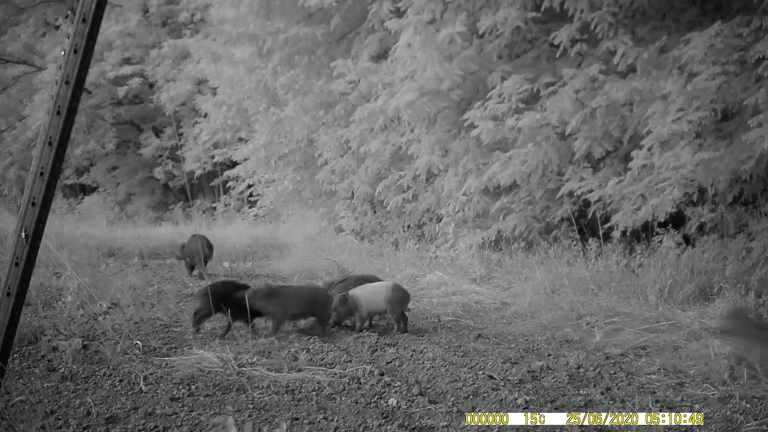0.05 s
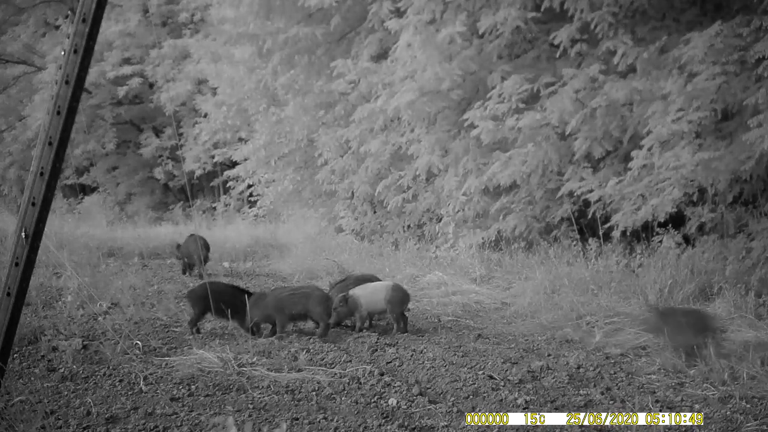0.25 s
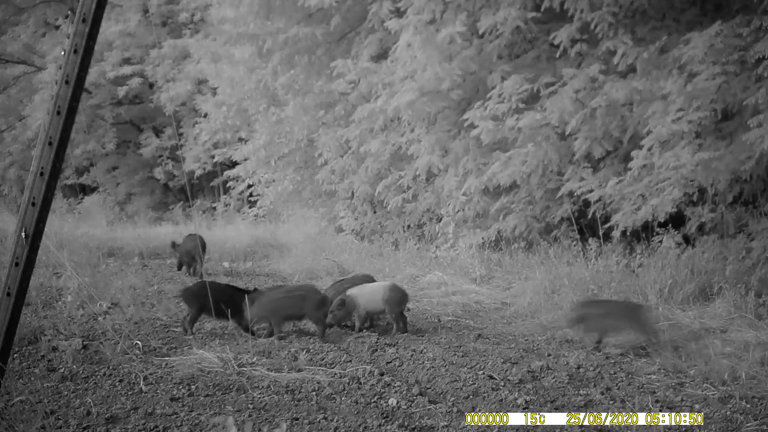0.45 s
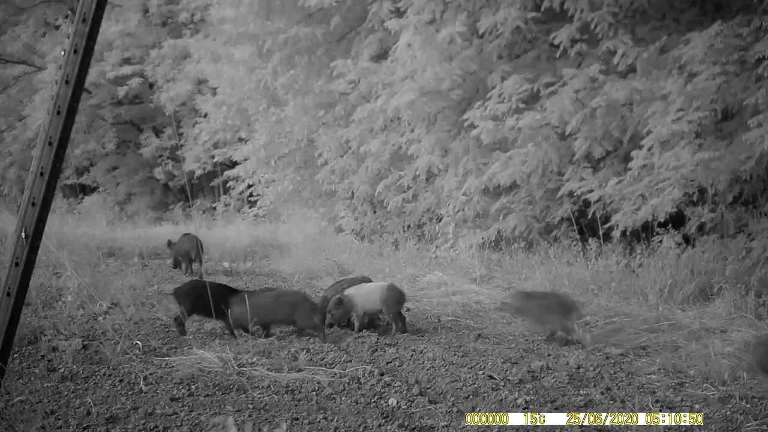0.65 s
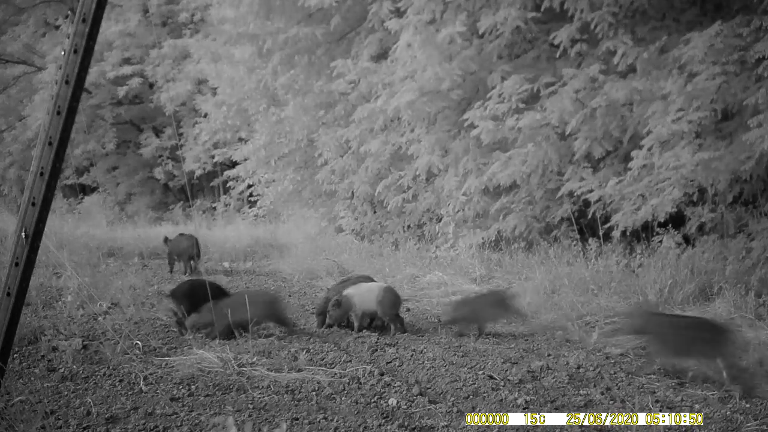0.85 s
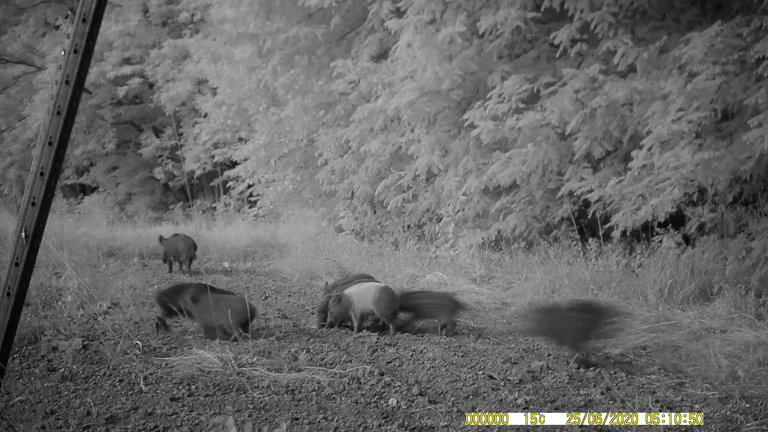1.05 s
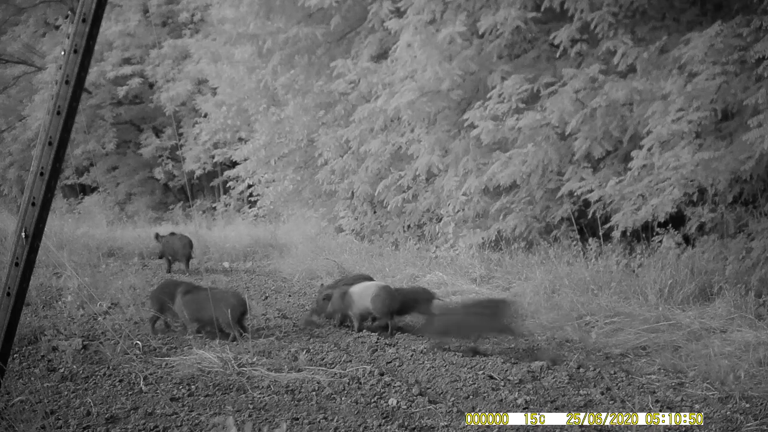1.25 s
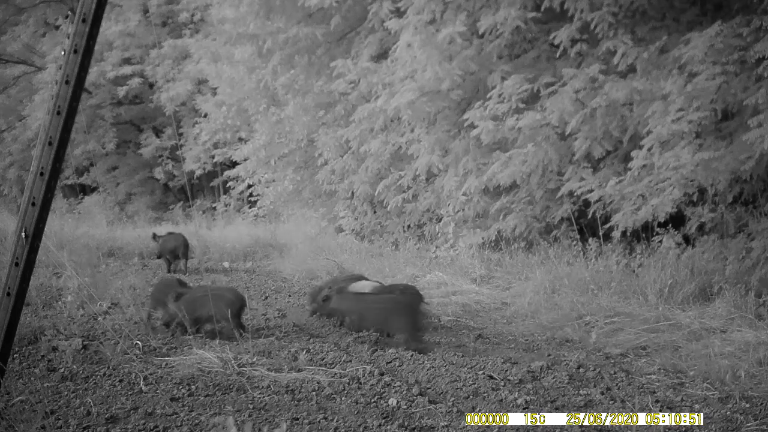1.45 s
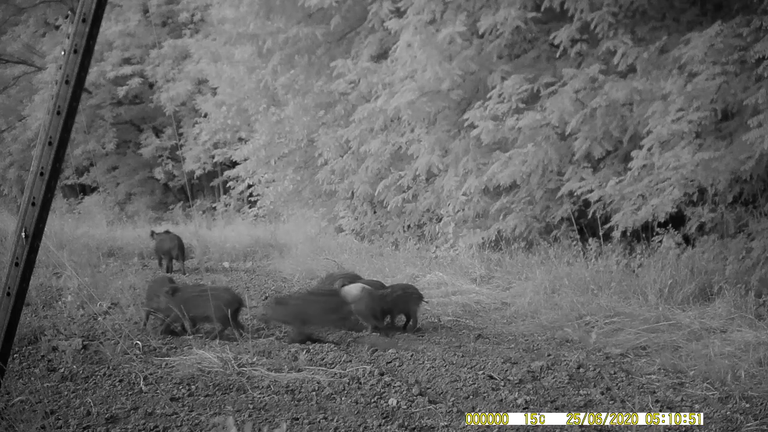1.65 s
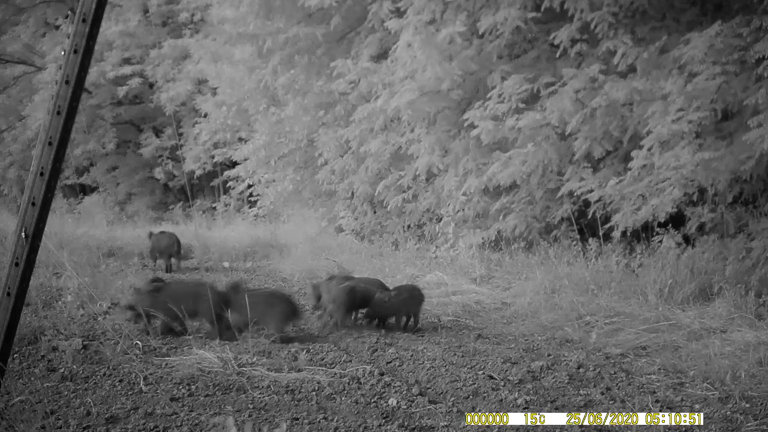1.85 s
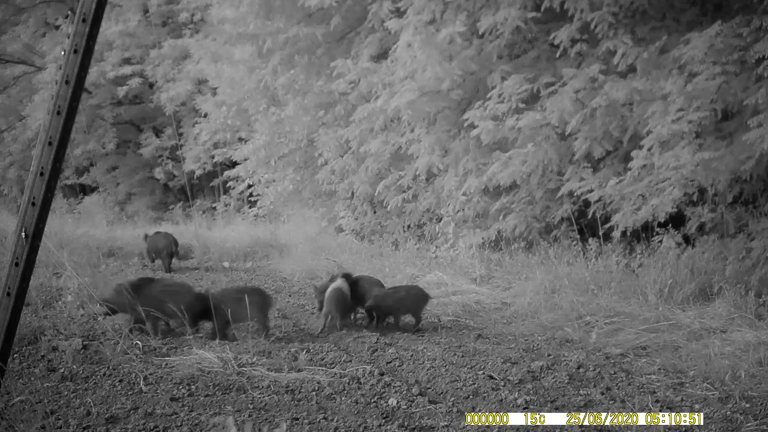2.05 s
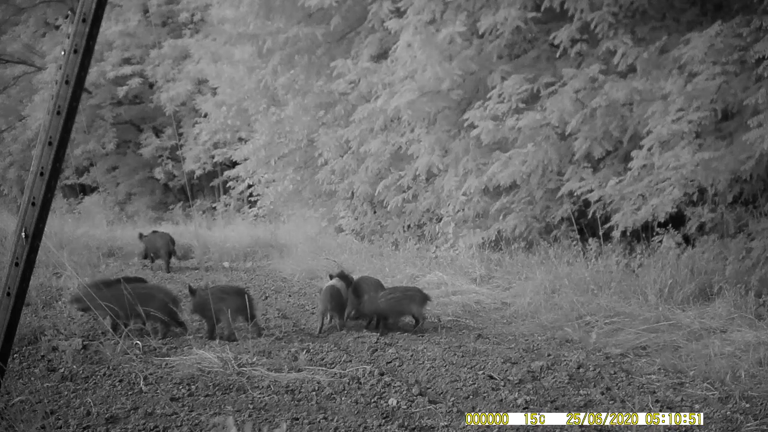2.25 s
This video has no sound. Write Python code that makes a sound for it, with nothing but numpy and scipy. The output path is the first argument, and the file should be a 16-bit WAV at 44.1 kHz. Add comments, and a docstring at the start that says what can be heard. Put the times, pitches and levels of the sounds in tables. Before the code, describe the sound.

Wild boars rustle through dry grass throughout, scuffing soil and snapping stalks, busiest from 0.5 to 1 second and easing after 2. One sharp, close click comes at 0.2 seconds. A small bird gives high, buzzy trills at about 0.5, 1.1 and 1.8 seconds, while another whistles faintly far off. Two tiny squeaks pass near 1.5 and 1.8 seconds. Underneath are steady hiss and low rumble with soft, dull swells.

```python
"""Dry grass rustles and snaps as wild boars trot and root through it, scuffing the loose soil. A small bird
repeats a buzzy trill of quick chips, another whistles far off, and two tiny squeaks pass. One sharp click
sounds at a trail camera, whose housing rings near 5 kHz in the click and the snapping stalks. Under it all lie
a low rumble with soft, dull swells and a steady hiss."""
import sys
import numpy as np
from scipy import signal
from scipy.fft import rfft, irfft, next_fast_len
from scipy.io import wavfile
from scipy.ndimage import map_coordinates

SR = 44100
rng = np.random.default_rng(int(sys.argv[2]) if len(sys.argv) > 2 else 0)


def wav_out(sig):
    """Save sig, one row per channel (or a flat mono array), as 16-bit PCM at SR to the path in sys.argv[1]."""
    wavfile.write(sys.argv[1], SR, np.round(np.clip(np.atleast_2d(sig).T, -1, 1) * 32767).astype(np.int16))


N = 101429


def boars(flutter_db=1.38, scuff_rise_s=0.0011):
    """Boars brush through the grass, scuff the soil and snap stalks."""
    # the herd's rustling (time [s], level [dB])
    rustle = [(0, -53), (.06, -49), (.12, -55), (.29, -55.5), (.40, -51.5), (.46, -52.5), (.55, -51.5),
              (.61, -54.5), (.71, -47), (.81, -51.5), (.91, -50), (1.0, -51.5), (1.25, -52), (1.43, -55.5),
              (1.65, -49.5), (1.77, -52), (2.01, -53), (2.08, -59), (2.3, -61.5)]
    # hoof and snout scuffs (time [s], grass level [dB], length [s], soil level [dB])
    scuffs = [(.008, -50.5, 0.023, -68), (0.494, -48, 0.016, -64), (0.531, -49.5, 0.02, -79),
              (0.552, -47.5, 0.0078, -75), (0.734, -45, 0.012, -52.5), (0.861, -47, 0.0096, -70),
              (0.889, -47, 0.0072, -57), (0.919, -47.5, 0.013, -63), (.998, -56, 0.0075, -63),
              (1.366, -46.5, 0.011, -76), (1.448, -47.5, 0.0073, -75), (1.596, -47.5, 0.016, -63),
              (1.643, -47, 0.0098, -73), (1.807, -47, 0.015, -70), (1.869, -47, 0.0066, -76),
              (2.004, -50.5, 0.018, -70), (2.115, -52, 0.018, -80)]
    # snapping stalks and crumbs (time [s], peak level [dB])
    snap_times = [(.151, -38), (.221, -35), (.3015, -39), (.320, -34), (.564, -31), (.690, -36),
                  (.7345, -33), (.743, -34), (.748, -31), (.8837, -26), (.9093, -31), (1.366, -35),
                  (1.576, -39), (1.872, -35), (1.947, -35), (2.173, -36), (2.2255, -42)]
    # tone of dry grass (frequency [Hz], relative level [dB])
    grass_tone = [(300, -58), (900, -11), (1400, -15), (1900, -16), (2900, -11), (3700, -7), (4450, -2),
                  (4900, -0.5), (5450, 1), (6100, -2), (7000, -5.5), (8200, -9), (9400, -11), (11000, -12),
                  (12500, -18), (15500, -28.5)]
    # tone of crunching soil (frequency [Hz], relative level [dB])
    soil_tone = [(200, -20), (700, -46), (1400, 8), (2000, 5), (3000, -10), (5000, 4), (9000, -36)]
    t = np.arange(N) / SR
    grass_power = amp(np.interp(t, *np.transpose(rustle)) + flutter_db * wobble(55.07)) ** 2
    soil_power = np.zeros(N)
    for start, grass_db, length, soil_db in scuffs:
        stroke = np.clip((t - start) / scuff_rise_s, 0, 1) * np.exp(-((t - start) / length) ** 2)
        grass_power += amp(grass_db) ** 2 * stroke
        soil_power += amp(soil_db) ** 2 * stroke
    snaps = ticks(snap_times, low_cut_hz=1900)
    grass = np.sqrt(grass_power) * crackle(grass_tone)
    soil = np.sqrt(soil_power) * crackle(soil_tone)
    return grass + soil + snaps + amp(-3.5) * woods(snaps, size=0.084)


def crackle(tone, breaks_per_s=2500, spread_db=2.7):
    """Many tiny breaks of uneven size, mixed equally with a soft brushing noise."""
    sizes = amp(spread_db * np.minimum(rng.exponential(size=N), 4))
    breaks = rng.random(N) < breaks_per_s / SR
    grains = unit(breaks * sizes * rng.choice([-1, 1], N))
    return coloured(grains + rng.standard_normal(N), tone)


def click(start_s=.2398, gap_s=.00101, first_db=-11, loss_db=2.5):
    """A close, dry click: the contact chatters back and forth, weaker each time."""
    chatter = np.zeros(N)
    for k in range(3):
        chatter += (-1) ** k * ticks([(start_s + k * gap_s, first_db - k * loss_db)], low_cut_hz=855)
    return chatter + amp(-13.5) * woods(chatter, size=0.14)


def ticks(hits, low_cut_hz, crack_db=-12, crack_fade_s=0.0038):
    """Sharp contacts: a crack and a brief ring of the housing, too small to carry any bass."""
    # ringing of the camera housing (pitch [Hz], relative level [dB], time to fade by 60 dB [s])
    housing = [(1310, -7, 0.014), (1650, -9, 0.0056), (2160, -0.5, 0.0052), (3150, -9, 0.024),
               (4330, 3, 0.0093), (5054, 11.5, 0.0048), (6340, -61, 0.0027), (8700, -10, 0.0037),
               (10800, -35, 0.0022)]
    # tone of the crack (frequency [Hz], relative level [dB])
    crack_tone = [(200, -40), (700, -20), (1300, 12), (6000, 5), (9500, -32), (15000, 5)]
    out, t = np.zeros(N), np.arange(SR // 25) / SR
    ring = sum(amp(db - 60 * t / fade) * np.sin(2 * np.pi * hz * t) for hz, db, fade in housing)
    noise = coloured(rng.standard_normal(N), crack_tone)
    bass_cut = signal.butter(2, low_cut_hz, "high", fs=SR, output="sos")
    for start, db in hits:
        crack = amp(crack_db - 60 * t / crack_fade_s) * np.roll(noise, -int(start * SR))[:len(t)]
        tick = signal.sosfilt(bass_cut, signal.sosfilt(bass_cut, ring + crack))
        add(out, start, amp(db) * tick / np.abs(tick).max())
    return out


def trilling_bird(chips=14, chip_hz=4430, fall_per_s=36, swell_db=4):
    """Each trill is a run of falling chips that slow down, lengthen and grow louder."""
    # the small bird's trills (time [s], level near the end [dB])
    trills = [(.5411, -43.5), (1.0827, -44), (1.8499, -44.5), (2.269, -53)]
    gap_s, gap_growth_s = .01262, .000193
    width_s, width_growth_s, tail_s = 0.0014, .00007, .0046
    out, t = np.zeros(N), np.arange(-SR // 100, SR // 100) / SR  # t is 0 at a chip's middle
    for start, db in trills:
        for k in range(chips):
            pitch_nudge, level_nudge, time_nudge = rng.normal(0, [.012, 1.5, .0004])  # ratio, dB, s
            hz = chip_hz * (1 + pitch_nudge) * np.exp(-fall_per_s * t)
            width = width_s + width_growth_s * k
            shape = np.exp(1 - np.sqrt(1 + (t / width) ** 2) - (t / tail_s) ** 4)
            level = amp(db + level_nudge - swell_db * (1 - k / chips) ** 2)
            middle = start + time_nudge + gap_s * k + gap_growth_s * k * k / 2
            add(out, middle + t[0], level * shape * np.sin(2 * np.pi * np.cumsum(hz) / SR))
    return out + amp(-19) * woods(out)


def squeaks():
    """Two short falling squeaks."""
    # squeaks (time [s], length [s], start pitch [Hz], middle pitch [Hz], end pitch [Hz], level [dB])
    notes = [(1.466, .018, 2380, 2280, 2000, -52), (1.833, .0045, 2600, 2100, 1750, -47)]
    calls = glides(notes, waver=.045)
    return calls + amp(-14) * woods(calls)


def far_bird():
    """A whistled song, blurred by the trees."""
    # whistles (time [s], length [s], start pitch [Hz], middle pitch [Hz], end pitch [Hz], level [dB])
    notes = [(0, .075, 2350, 2550, 2900, -64), (.07, .08, 2930, 3030, 2980, -64),
             (.185, .14, 3480, 3470, 3540, -62), (.33, .095, 2780, 3000, 3060, -62),
             (.46, .12, 2290, 2320, 2300, -67), (.59, .08, 3130, 3160, 3200, -65),
             (.69, .06, 3020, 2980, 3020, -67), (1.19, .04, 3200, 3050, 2850, -66),
             (1.33, .03, 3700, 3620, 3580, -61), (1.46, .12, 3450, 3350, 3250, -65),
             (1.69, .11, 2780, 2760, 2730, -68), (1.812, .028, 3720, 3640, 3540, -57),
             (2.03, .11, 3080, 2980, 2900, -70)]
    song = glides(notes, waver=.015)
    return song + amp(1) * woods(song)


def glides(notes, waver):
    """Pure notes that bend through three pitches and waver a little."""
    out, drift = np.zeros(N), 1 + waver * wobble(250)
    for start, length, *pitches, db in notes:
        progress = np.linspace(0, 1, int(length * SR))
        bend = np.polyval(np.polyfit([0, .5, 1], pitches, 2), progress)
        hz = bend * np.roll(drift, -int(start * SR))[:len(progress)]
        shape = np.sqrt(np.abs(np.sin(np.pi * progress)))
        add(out, start, amp(db) * shape * np.sin(2 * np.pi * np.cumsum(hz) / SR))
    return out


def woods(sound, size=1):
    """The forest edge scatters sound into a soft echo; a smaller size makes it shorter."""
    # the echo at size 1 (frequency [Hz], time to fade by 60 dB [s])
    fade_times = [(300, 0.094), (3000, .35), (10000, 0.14)]
    hz, t, bands = signal.stft(rng.standard_normal(SR // 2), SR, nperseg=256)
    fade = amp(-60 * t / (size * along(fade_times, hz)[:, None]))
    tail = signal.istft(bands * fade, SR, nperseg=256)[1]
    return signal.fftconvolve(sound, tail / np.linalg.norm(tail))[:N]


def low_thuds(rise_s=0.006, fade_s=0.16):
    """Soft, dull low swells in the rumble."""
    # low swells (time [s], pitch [Hz], level [dB])
    swells = [(0.349, 68.6, -43), (.665, 95, -52.5), (.755, 64, -52), (.995, 107, -45), (1.237, 61, -43),
              (1.581, 128, -50.5), (1.887, 65, -49), (1.996, 77, -43.5), (2.079, 87, -47)]
    out, t = np.zeros(N), np.arange(SR // 4) / SR
    for start, hz, db in swells:
        shape = amp(db - 60 * t / fade_s) * (1 - np.exp(-t / rise_s))
        add(out, start, shape * np.sin(2 * np.pi * hz * t + rng.uniform(0, 2 * np.pi)))
    return out


def background():
    """Steady low rumble and microphone hiss."""
    # tone of the rumble (frequency [Hz], relative level [dB])
    rumble_tone = [(15, -5), (30, -8), (42, -4), (66, -1.5), (90, -4), (125, -3), (165, -8.5), (220, -9.5),
                   (300, -13), (600, -15), (1000, -20.5), (2000, -27), (5000, -57)]
    # tone of the hiss (frequency [Hz], relative level [dB])
    hiss_tone = [(200, -6.5), (1400, -7), (2000, -4), (3200, 7.5), (4500, -2), (5500, -5), (7500, -12),
                 (11000, -2.5), (15500, -6.5)]
    rumble = amp(-55) * coloured(rng.standard_normal(N), rumble_tone)
    hiss = amp(-67) * coloured(rng.standard_normal(N), hiss_tone)
    return rumble + hiss


def amp(db):
    """Turn decibels into a multiplier."""
    return 10 ** (np.asarray(db) / 20)


def unit(sound):
    """Scale to an average power of 1."""
    return sound / np.sqrt(np.mean(sound ** 2) + 1e-20)


def along(points, hz):
    """Read between (frequency, value) points, with octaves evenly spaced."""
    frequencies, values = np.transpose(points)
    return np.interp(np.log(hz + 1), np.log(frequencies + 1), values)


def wobble(rate):
    """A smooth curve through `rate` random points a second."""
    return map_coordinates(rng.standard_normal(4000), [np.arange(N) * rate / SR], mode="wrap")


def filtered(sound, gain_at):
    """Turn each frequency up or down by gain_at(hz)."""
    size = next_fast_len(N + 8192)
    return irfft(rfft(sound, size) * gain_at(np.fft.rfftfreq(size, 1 / SR)), size)[:N]


def coloured(sound, tone):
    """Give a sound a tone, at an average power of 1."""
    return unit(filtered(sound, lambda hz: amp(along(tone, hz))))


def add(track, start_s, sound):
    """Mix a sound into the track."""
    i = max(0, round(start_s * SR))
    track[i:i + len(sound)] += sound[:max(0, N - i)]


def scene():
    """Everything reaches one microphone."""
    return (boars() + low_thuds() + trilling_bird() + far_bird() + squeaks() + click() + background())[None]


def record(dry):
    """The camera cuts off the very highest treble."""
    top_hz = 15900
    return filtered(dry[0], lambda hz: 1 / np.sqrt(1 + (hz / top_hz) ** 160))[None]


dry = scene()
out = record(dry)
wav_out(out)
```